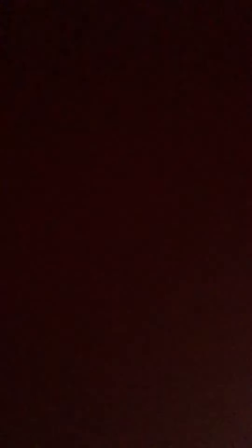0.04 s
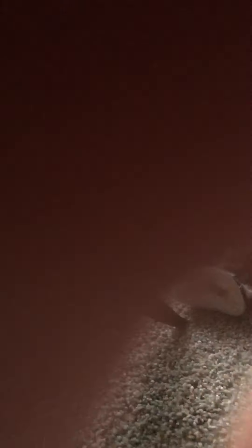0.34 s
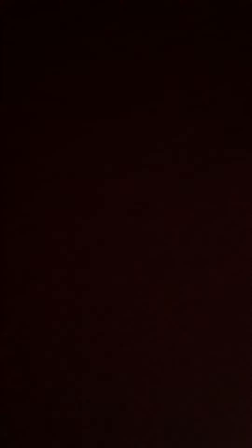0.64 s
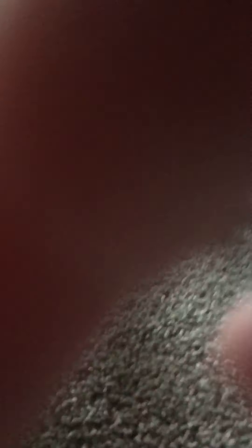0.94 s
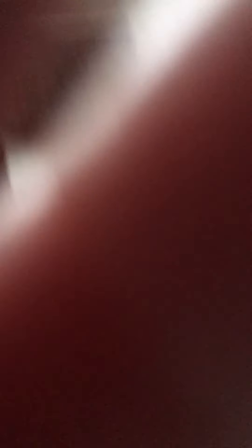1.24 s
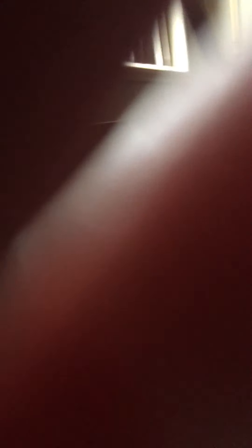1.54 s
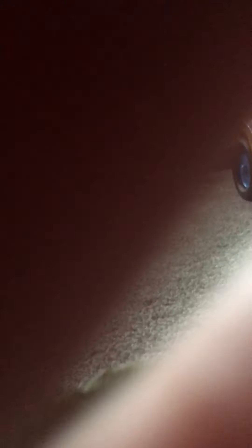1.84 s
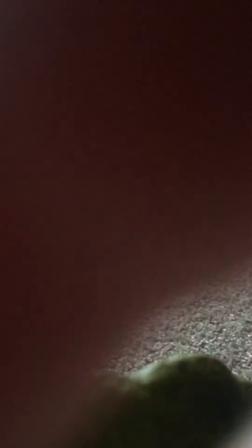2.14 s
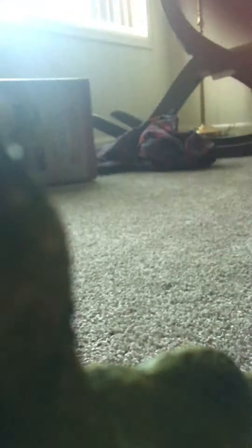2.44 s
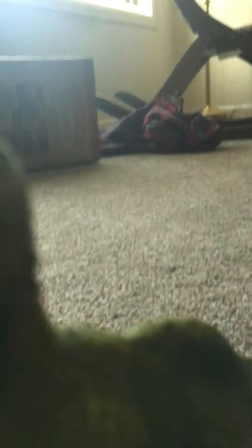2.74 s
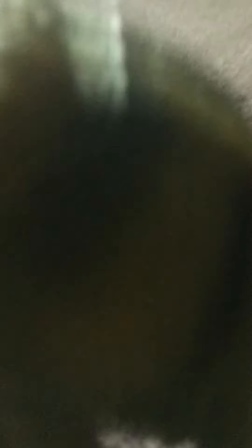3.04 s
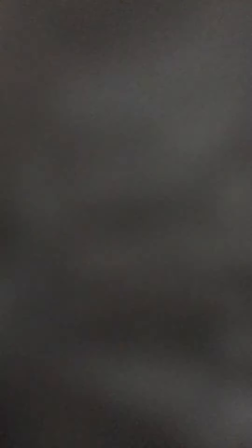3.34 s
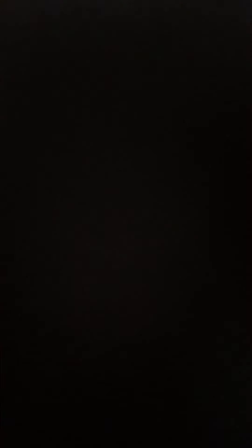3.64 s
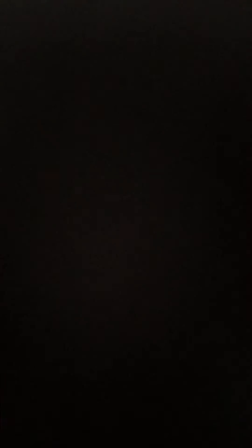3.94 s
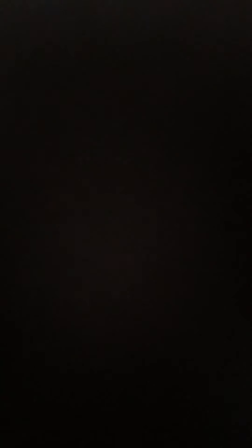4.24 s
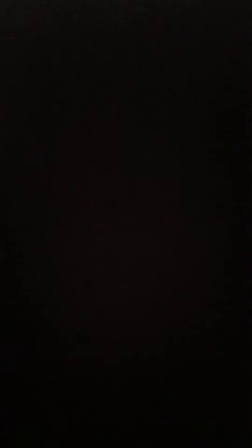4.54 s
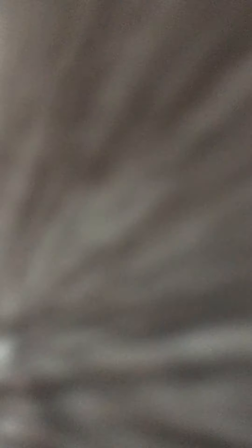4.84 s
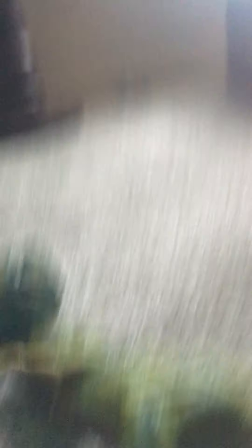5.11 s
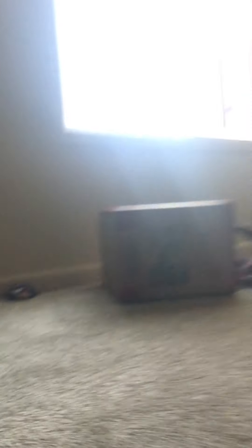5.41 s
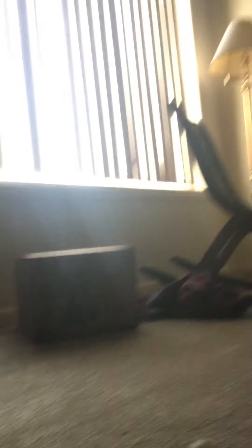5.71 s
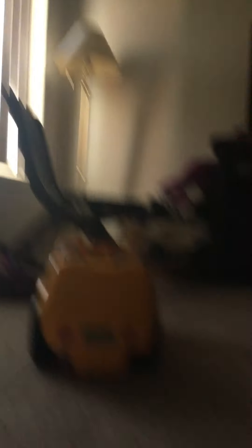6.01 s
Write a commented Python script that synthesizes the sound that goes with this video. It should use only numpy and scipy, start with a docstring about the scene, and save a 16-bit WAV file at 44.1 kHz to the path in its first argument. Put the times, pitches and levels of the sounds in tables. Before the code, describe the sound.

Close phone handling noise: skin brushing, dull thumps, scrapes and a cloth rub, in a quiet room with a faint hum.

```python
"""A phone is shifted about in someone's hands in a quiet carpeted room.
Skin first brushes past the microphone port and fingertips tap; a knock on the case follows at 1.7 s.
From 2.6 s the grip shifts: skin judders, drags and peels, and fingers thump the case, scrape and
close over the port, loudest at 3.0-3.4 s. Cloth then rubs, with two softer knocks, and faint skin
strokes end it. Air noise and a faint appliance hum run throughout."""
import sys
import numpy as np
from scipy import signal
from scipy.fft import rfft, irfft
from scipy.io import wavfile
from scipy.ndimage import uniform_filter1d, map_coordinates

SR = 44100
rng = np.random.default_rng(int(sys.argv[2]) if len(sys.argv) > 2 else 0)


def generate_wav(sig):
    """Save sig (samples, or channels by samples) to the path in sys.argv[1] as 16-bit PCM at SR."""
    pcm = np.round(np.clip(np.atleast_2d(sig).T, -1, 1) * 32767).astype(np.int16)
    wavfile.write(sys.argv[1], SR, pcm)


N = 267687
TIME = np.arange(N) / SR

# friction spectrum of each contact kind: (frequency [Hz], gain [dB])
SWISH = [(59, -23), (100, 7.5), (147, 2.5), (271, -8), (322, -3.5), (513, -16.5), (1170, -11), (1610, -20),
         (1950, -11), (4980, -13), (6420, -9.5), (8460, -31.5), (16000, -34)]
BRUSH = [(59, -39), (100, 7), (189, -10), (302, 1), (452, -3), (621, -0.5), (818, -3), (2470, -17),
         (4290, -21), (16000, -40.5)]
SKIN = [(47, -21), (80, 6.5), (208, 1.5), (482, -12), (563, -6.5), (768, -15), (820, -10.5), (1250, -10.5),
        (10300, -25.5), (12800, -27), (16000, -26)]
PALM = [(59, -28.5), (100, 7.5), (147, -14.5), (193, -4), (442, -12), (1150, -16.5), (3190, -24),
        (5530, -29), (16000, -45.5)]
CRACKLE = [(350, -38.5), (600, -7), (931, -10), (1160, -6.5), (1800, -6.5), (4160, -15.5), (5400, -7.5),
           (11700, -21.5), (16000, -28.5)]
JUDDER = [(41, -52.5), (70, -18.5), (197, 3.5), (273, -10), (394, -26), (545, -15), (852, -36.5),
          (1250, -34.5), (1700, -46.5), (2940, -43.5), (9000, -73), (11700, -90.5), (19800, -120)]
DRAG = [(41, -39.5), (70, -14), (210, 0.5), (375, -25.5), (427, -11.5), (496, -16.5), (615, -10.5),
        (887, -26.5), (1390, -24), (1490, -30.5), (2720, -30.5), (4090, -47.5), (12000, -61.5),
        (15600, -98.5), (22000, -120)]
RASP = [(180, -42), (300, -13), (842, -13.5), (946, -9.5), (1140, -24), (1430, -6), (1930, -2.5),
        (3190, -8.5), (4090, -29.5), (6100, -18.5), (6850, -32), (9550, -31), (16000, -50.5)]
SCRAPE = [(150, -55), (250, -25), (686, -6.5), (1010, -2), (1100, -5), (1380, -9.5), (1850, -11.5),
          (2130, -4), (2910, -9), (3910, -8.5), (5160, -19), (16000, -39)]
CLOTH = [(47, -57), (80, 4.5), (119, -2.5), (242, 1), (277, -2), (395, -6), (504, -8.5), (917, -5),
         (1000, -10), (1070, -8), (2330, -12.5), (4830, -31), (16000, -48)]


def knocks(glide_cycles=.28, length_at_100hz_s=.0125):
    """Firm knocks on the case: thud, ring and click; a deeper thud glides slower and lasts longer."""
    # (time [s], level [dB], start [Hz], settled [Hz], ring [Hz], ring [dB re level],
    #  click [dB re level], click middle [dB re treble], click top [Hz])
    blows = [(1.733, -7, 520, 123, 504, -2, -2.5, -2, 5860),
             (2.9712, -8.5, 500, 154, 400, 2.5, -8, 15, 8900),
             (3.1705, -6.5, 400, 115, 604, -7, 2.5, -4.5, 13940),
             (3.1802, -4.5, 215.6, 116, 700, -10.5, -5.5, -2.5, 14000),
             (3.3323, -22.5, 249, 68, 593, -10, -7.5, 10.5, 7000),
             (3.38, -8, 420, 150, 385.5, 4.5, -5.5, 3.5, 16000),
             (3.3867, -5.5, 400, 91, 960, -4, -2, 2, 16050),
             (4.503, -22.5, 327, 52.8, 590, -14.5, -29.5, 23.5, 5010),
             (4.83, -17, 180, 62, 625, -5.5, -20, -10, 16000)]
    out = np.zeros(N)
    for s, db, start_hz, end_hz, ring_hz, ring_db, click_db, middle_db, top_hz in blows:
        length_s = length_at_100hz_s * (100 / end_hz) ** 1.35
        low = thud(start_hz, end_hz, glide_cycles / end_hz, length_s)
        add(out, s, undb(db) * (low + undb(ring_db) * ring(ring_hz, db)))
        add(out, s, undb(db + click_db) * lowpass(tick(middle_db), top_hz))
    return out


def presses(glide_cycles=.39, length_cycles=1.45, ring_hz=400, ring_db=-20.5):
    """A soft finger pad pushes air into the port: a cycle or two of bass, hardly any ring."""
    # (time [s], level [dB], start [Hz], settled [Hz])
    pushes = [(.765, -39, 197, 92), (.889, -30, 230, 76), (.965, -37.5, 130, 58.6),
              (1.2075, -17.5, 118, 107), (1.242, -19, 120, 112), (1.655, -35, 110, 70),
              (1.748, -17, 100, 64), (2.985, -18.5, 90, 60), (3.018, -14.5, 117, 84), (3.068, -23, 130, 80),
              (3.257, -20, 110, 55), (3.364, -22.5, 197, 62.4), (3.403, -4.5, 239, 47.3),
              (3.474, -21.5, 111.2, 54.3), (3.53, -25, 69.7, 39.4)]
    out = np.zeros(N)
    for s, db, start_hz, end_hz in pushes:
        low = thud(start_hz, end_hz, glide_cycles / end_hz, length_cycles / end_hz)
        add(out, s, undb(db) * (low + undb(ring_db) * ring(ring_hz, db)))
    return out


def taps(ring_hz=583, ring_db=-2.5):
    """Fingertips land lightly on the case: the same small thud, a short ring, a dull click."""
    # (time [s], level [dB], click [dB re level])
    landings = [(.353, -34.5, -36), (0.384, -30, -16), (.398, -30.5, -26), (0.4824, -38, -20),
                (1.204, -29, -8), (1.697, -32.5, -12.5), (1.748, -25, -10), (1.969, -34, -24),
                (2.005, -36.5, -12), (2.148, -35, -20.5), (5.649, -55.5, 2.5)]
    out = np.zeros(N)
    low = thud(start_hz=410, end_hz=100, glide_s=.0017, length_s=.013)
    for s, db, click_db in landings:
        add(out, s, undb(db) * (low + undb(ring_db) * ring(ring_hz, db)))
        add(out, s, undb(db + click_db) * tick(middle_db=14.5))
    return out


def thud(start_hz, end_hz, glide_s, length_s, rise_s=.0011):
    """A fingertip lands and flattens: the growing contact pulls the pitch down."""
    t = TIME[:SR // 4]
    hz = end_hz + (start_hz - end_hz) * np.exp(-t / glide_s)
    envelope = (1 - np.exp(-t / rise_s)) * np.exp(-(t / length_s) ** 1.8)
    return envelope * np.sin(2 * np.pi * np.cumsum(hz) / SR)


def ring(ring_hz, blow_db, decay_at_0db_s=.0049, bend=.71, bend_s=.001):
    """The case rings and sags in pitch; light taps die at once under the skin, firm blows ring on."""
    t = TIME[:SR // 4]
    hz = ring_hz * (1 + bend * np.exp(-t / bend_s))
    decay_s = decay_at_0db_s * undb(.43 * blow_db)
    return np.sin(2 * np.pi * np.cumsum(hz) / SR) * np.exp(-t / decay_s)


def slides(attack_s=.0081, release_s=.0028, waver=.055, waver_per_s=110):
    """A finger slides under changing pressure until it slips off; its resonances waver with the contact."""
    # (start [s], stop [s], final level [dB], growth [dB], contact kind)
    moves = [(1.141, 1.226, -38.5, 31.5, "crackle"), (1.2, 1.409, -55.5, -5, "palm"),
             (2.791, 2.976, -23, 31.5, "drag"), (3.076, 3.137, -31, 4, "rasp"),
             (3.182, 3.253, -17.5, 10, "scrape")]
    out = np.zeros(N)
    for start_s, stop_s, db, growth_db, kind in moves:
        length_s = stop_s - start_s
        t = np.arange(0, length_s + 10 * release_s, 1 / SR)
        force = undb(db - growth_db * np.maximum(1 - t / length_s, 0))
        gate = np.minimum(t / attack_s, 1) * np.exp(-np.maximum(t - length_s, 0) / release_s)
        position = np.cumsum(1 + waver * walk(waver_per_s)[:len(t)])
        friction = map_coordinates(rub(kind, len(t)), [position], mode="mirror")
        add(out, start_s, force * gate * friction)
    return out


def strokes(taper=1.82):
    """Skin and cloth pass the port; each stroke swells and dies with the hand's speed."""
    # (peak time [s], rise [s], fall [s], level [dB], contact kind)
    passes = [(.023, 0.11, 0.2, -45, "swish"), (.142, 0.062, 0.1, -47.5, "brush"),
              (.36, 0.22, 0.38, -62, "brush"), (.72, .16, 0.22, -54, "skin"),
              (0.776, .014, 0.012, -46.5, "brush"), (.79, 0.041, 0.058, -52, "skin"),
              (.93, 0.074, 0.11, -52.5, "skin"), (1.13, .13, .1, -60, "palm"),
              (1.682, 0.29, 0.36, -60.5, "palm"), (2.075, .08, 0.045, -52.5, "cloth"),
              (3.021, 0.052, 0.059, -46, "crackle"), (3.382, 0.007, 0.0053, -22.5, "scrape"),
              (3.409, .06, 0.042, -40.5, "palm"), (3.477, 0.016, 0.029, -44, "cloth"),
              (3.525, .012, 0.039, -45.5, "cloth"), (3.749, .15, 0.46, -64, "cloth"),
              (4.37, .13, 0.18, -61.5, "squeak"), (4.505, 0.019, 0.098, -50.5, "cloth"),
              (4.685, .043, 0.1, -37.5, "cloth"), (4.88, 0.18, 0.16, -57, "cloth"),
              (5.44, 0.16, 0.39, -63.5, "skin"), (5.79, 0.11, 0.16, -62, "skin")]
    out = np.zeros(N)
    for peak_s, rise_s, fall_s, db, kind in passes:
        t = np.arange(-2 * rise_s, 2 * fall_s, 1 / SR)
        speed = np.exp(-taper * (t / np.where(t < 0, rise_s, fall_s)) ** 2)
        add(out, peak_s + t[0], undb(db) * speed * rub(kind, len(t)))
    return out


def judder(gain_db=-1.5):
    """Skin shudders across the case with a low burr as the grip shifts."""
    # one curve per shift: (time [s], level [dB re gain_db])
    grip_shifts = [
        [(1.768, -30.5), (1.826, -41), (1.846, -44), (1.996, -49.5), (2.02, -33.5), (2.104, -27),
         (2.142, -51.5), (2.3, -54.5)],
        [(2.62, -62), (2.638, -47.5), (2.698, -57), (2.824, -35.5), (2.848, -48.5), (2.876, -32),
         (2.954, -35.5), (2.965, -27)],
    ]
    out = np.zeros(N)
    for curve in grip_shifts:
        s, db = np.transpose(curve)
        t = np.arange(s[0], s[-1], 1 / SR)
        add(out, s[0], undb(gain_db + np.interp(t, s, db)) * rub("judder", len(t)))
    return out


def rub(kind, count):
    """Friction at rms 1, coloured by what touches the port and by the gap under the hand."""
    # kind: (spectrum, slip rate [1/s], log spacing spread, size spread [dB], hiss [dB],
    #        gap resonance [Hz], gap width [Hz], gap gain [dB])
    contacts = { "swish": (SWISH, 5000, .8, 3.3, 0, 3000, 280, -8),
                "brush": (BRUSH, 4000, 0.71, 3.7, 0, 6700, 2000, 3),
                "skin": (SKIN, 900, 1, 4, -1, 3030, 520, -3),
                "palm": (PALM, 1200, .8, 4.5, -1, 5700, 500, 4),
                "squeak": (CLOTH, 2000, .6, 3, 0, 4150, 220, 11),
                "crackle": (CRACKLE, 1100, 0.85, 5, -9, 5900, 830, -13),
                "judder": (JUDDER, 190, .14, 5.1, -9, 225, 70, -8),
                "drag": (DRAG, 170, .35, 2.5, -5, 1300, 400, -5),
                "rasp": (RASP, 600, .5, 4.4, -7, 2400, 200, -5),
                "scrape": (SCRAPE, 1300, .7, 3.5, -5, 2130, 140, 2),
                "cloth": (CLOTH, 2000, .8, 3.1, -1.5, 984, 130, 0)}
    spectrum, slips_per_s, spread, size_db, hiss_db, gap_hz, width_hz, gap_db = contacts[kind]
    friction = colour(slips(count, slips_per_s, spread, size_db, hiss_db), spectrum)
    return unit(friction + undb(gap_db) * resonate(friction, gap_hz, width_hz))


def slips(count, slips_per_s, spread, size_db, hiss_db):
    """Stick-slip pulses of uneven spacing and size, over a smooth hiss."""
    spacing, size = rng.standard_normal((count // 2, 2)).T
    onsets = np.cumsum(np.exp(spread * spacing) * SR / slips_per_s).astype(int)
    inside = onsets < count
    pulses = np.bincount(onsets[inside], undb(size_db * size[inside]), count)
    return unit(pulses - pulses.mean()) + undb(hiss_db) * rng.standard_normal(count)


def peel(start_s=3.0023, end_s=3.051, ticks_per_s=195, start_db=-19.5, fade_db_per_s=202):
    """Skin comes off the case in nearly even steps, weaker as the contact shrinks."""
    jitter_s, scatter_db = .00033, 3
    out = np.zeros(N)
    for s in np.arange(start_s, end_s, 1 / ticks_per_s):
        late, size, dullness = rng.standard_normal(3)
        db = start_db - fade_db_per_s * (s - start_s) + scatter_db * size
        add(out, s + jitter_s * late, undb(db) * tick(middle_db=-4 + scatter_db * dullness))
    return out


def ticks():
    """Single spots of skin snap free of the case."""
    # (time [s], level [dB], middle-band gain [dB])
    releases = [(0.6091, -45.5, 10), (.6756, -36.5, 5.5), (.9435, -48.5, -3), (1.215, -22, -11),
                (2.0436, -33, 5), (3.0684, -27.5, 9.5), (3.3498, -31.5, -19), (3.3971, -18.5, -20),
                (3.424, -33, -12), (4.833, -40.5, -23), (4.849, -38, -27)]
    out = np.zeros(N)
    for s, db, middle_db in releases:
        add(out, s, undb(db) * tick(middle_db))
    return out


def tick(middle_db, treble_s=.00045, middle_s=.0013, spray_db=-8):
    """Tacky skin snaps: one sharp step and a spray of tiny ones, the middle outlasting the treble."""
    # (frequency [Hz], gain [dB])
    snap_spectrum = [(1500, -32.5), (2800, -1), (3500, 1.5), (4500, -4), (6300, -2), (8500, -6.5),
                     (10500, -11), (16000, -16)]
    t = TIME[:SR // 50]
    impulse = t == 0
    spray = undb(spray_db) * rng.standard_normal((2, len(t)))
    treble = colour(impulse + spray[0] * np.exp(-t / treble_s), snap_spectrum)
    middle = band(impulse + spray[1] * np.exp(-t / middle_s), 590, 1700)
    return undb(-20) * unit(treble) + undb(middle_db - 23) * unit(middle)


def case(x, ring_db=-4, direct_db=1):
    """Every touch reaches the microphone directly and through the case's resonances."""
    # (frequency [Hz], width [Hz], gain [dB re ring_db])
    modes = [(290, 30, -2.5), (400, 92, 2.5), (633, 200, 3), (960, 150, -4.5), (1265, 240, -4.5),
             (3770, 120, -6.5)]
    rings = sum(undb(db) * resonate(x, hz, width_hz) for hz, width_hz, db in modes)
    return undb(direct_db) * x + undb(ring_db) * rings


def room(x, t60_s=.29, wet_db=-38):
    """The carpeted room returns only a trace of the handling."""
    t = TIME[:SR // 2]
    tail = band(rng.standard_normal(len(t)), 90, 4500) * np.exp(-np.log(1000) * t / t60_s)
    return undb(wet_db) * signal.fftconvolve(x, tail / np.linalg.norm(tail))[:N]


def hum(waver_db=2, drift_rad=1):
    """An appliance motor's lines waver in level and phase."""
    # (frequency [Hz], rms level [dB])
    motor_lines = [(59.2, -65), (118.4, -62), (193.8, -69), (220.7, -64.5), (242.2, -66)]
    out = np.zeros(N)
    for hz, db in motor_lines:
        amplitude = np.sqrt(2) * undb(db + waver_db * walk(1.4))
        out += amplitude * np.sin(2 * np.pi * hz * TIME + drift_rad * walk(2.8))
    return out


def air(rms_db=-56.5):
    """Steady, mostly low air noise."""
    # (frequency [Hz], relative density [dB])
    spectrum = [(15, -49), (25, -24), (47, 1.5), (92, -12), (123, -3), (149, -23), (190, -3.5), (249, -8),
                (270, -9.5), (335, -12.5), (545, -22.5), (734, -20), (1840, -29.5), (2910, -35),
                (16000, -49)]
    return undb(rms_db) * unit(colour(rng.standard_normal(N), spectrum))


def undb(db):
    """Decibels to gain."""
    return 10 ** (np.asarray(db) / 20)


def unit(x):
    """Scale to rms 1."""
    return x / np.sqrt(np.mean(x ** 2) + 1e-20)


def add(out, s, x):
    """Mix x into out from time s on."""
    i = int(round(s * SR))
    x, i = x[max(-i, 0):], max(i, 0)
    out[i:i + len(x)] += x[:len(out) - i]


def band(x, lo_hz, hi_hz):
    """Gentle causal band-pass."""
    return signal.sosfilt(signal.butter(2, [lo_hz, hi_hz], "band", fs=SR, output="sos"), x)


def lowpass(x, top_hz):
    """Gentle causal low-pass."""
    return signal.sosfilt(signal.butter(2, top_hz, fs=SR, output="sos"), x)


def resonate(x, hz, width_hz):
    """One resonance, gain 1 at its centre."""
    return signal.lfilter(*signal.iirpeak(hz, hz / width_hz, fs=SR), x)


def colour(x, points, size=8192):
    """Minimum-phase filter through (frequency [Hz], gain [dB]) points."""
    hz, db = np.transpose(points)
    bins_hz = np.maximum(np.fft.rfftfreq(size, 1 / SR), 1)
    gain = undb(np.interp(np.log(bins_hz), np.log(hz), db))
    cepstrum = irfft(np.log(gain))
    cepstrum[1:size // 2] *= 2
    cepstrum[size // 2 + 1:] = 0
    return signal.fftconvolve(x, irfft(np.exp(rfft(cepstrum))))[:len(x)]


def walk(steps_per_s):
    """Smooth random wander with a spread near 1."""
    hold = int(SR / steps_per_s)
    return uniform_filter1d(np.repeat(rng.standard_normal(N // hold + 1), hold), hold)[:N]


def scene():
    """Handling noise through the case, over the quiet room; mono."""
    touch = case(knocks() + taps() + presses() + ticks() + peel() + strokes() + slides() + judder())
    return (touch + room(touch) + hum() + air())[None]


def record(dry, low_hz=22, top_hz=16000):
    """The phone drops the deepest rumble, clips at full scale and cuts the top."""
    x = signal.sosfilt(signal.butter(2, low_hz, "high", fs=SR, output="sos"), dry)
    return signal.sosfilt(signal.ellip(8, .2, 70, top_hz, fs=SR, output="sos"), np.clip(x, -1, 1))


dry = scene()
out = record(dry)
generate_wav(out)
```